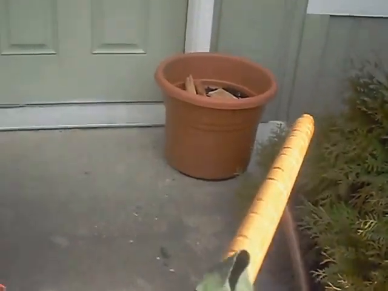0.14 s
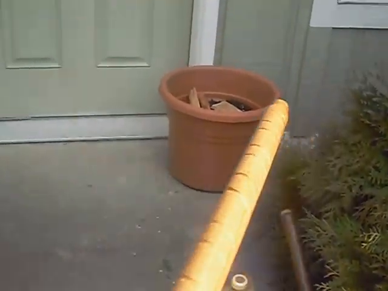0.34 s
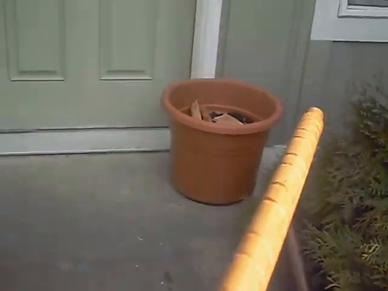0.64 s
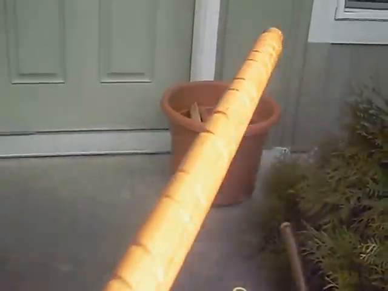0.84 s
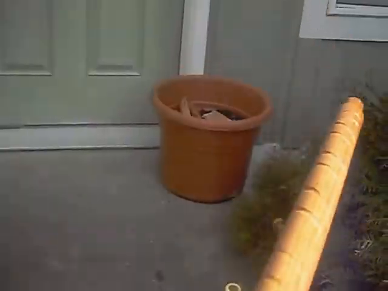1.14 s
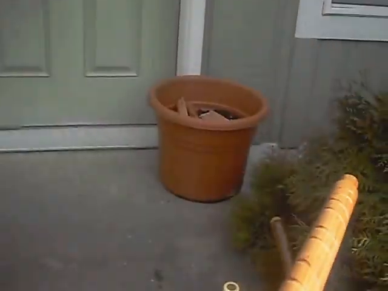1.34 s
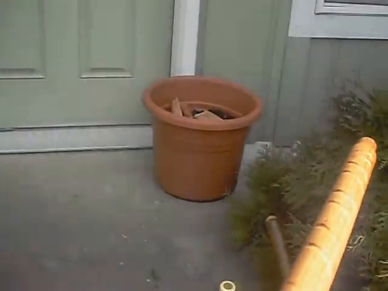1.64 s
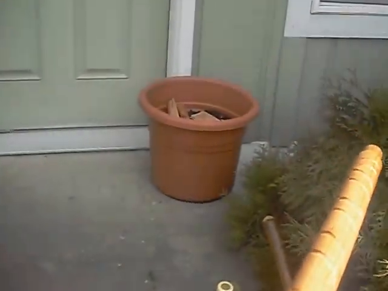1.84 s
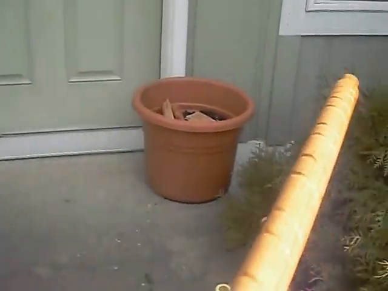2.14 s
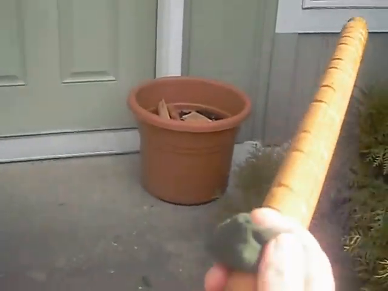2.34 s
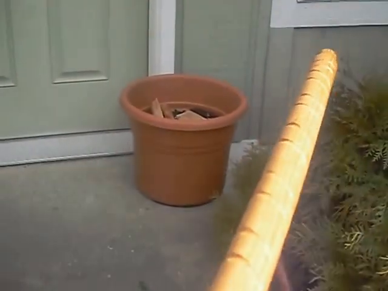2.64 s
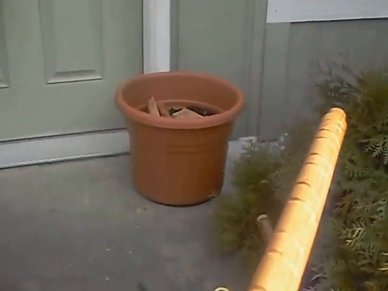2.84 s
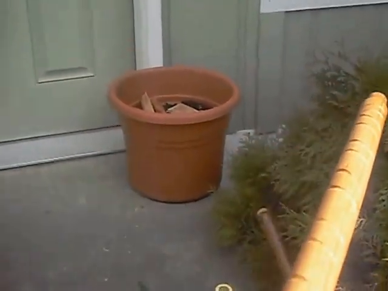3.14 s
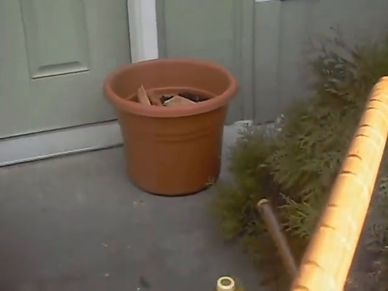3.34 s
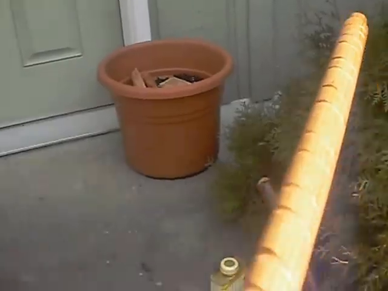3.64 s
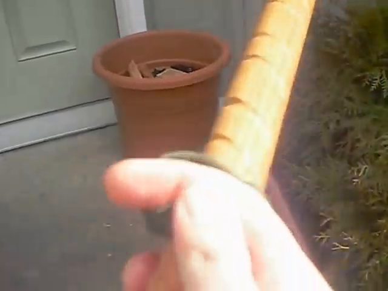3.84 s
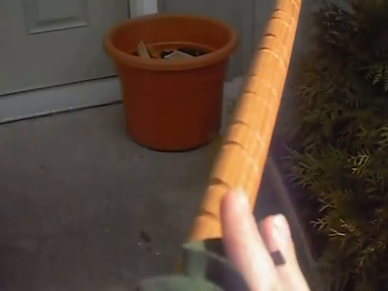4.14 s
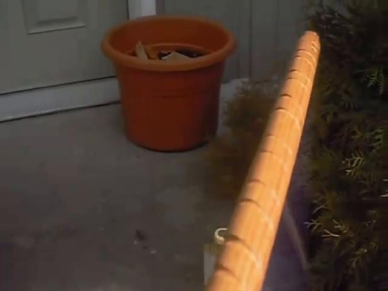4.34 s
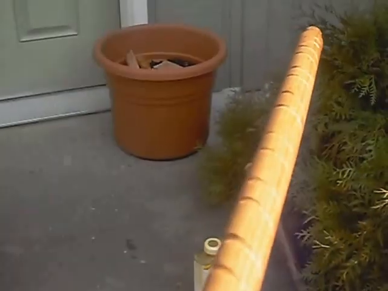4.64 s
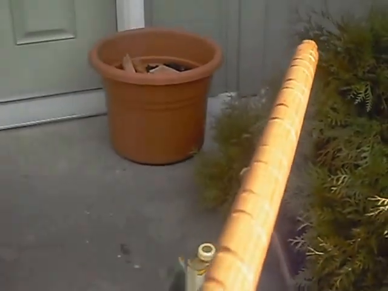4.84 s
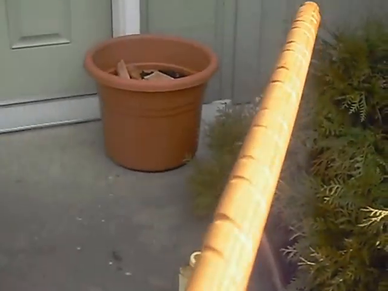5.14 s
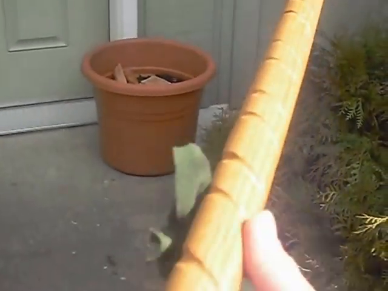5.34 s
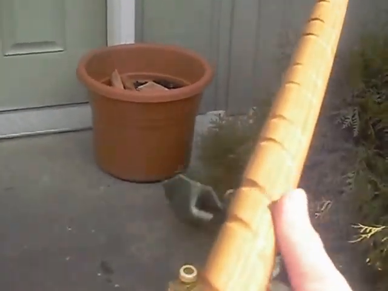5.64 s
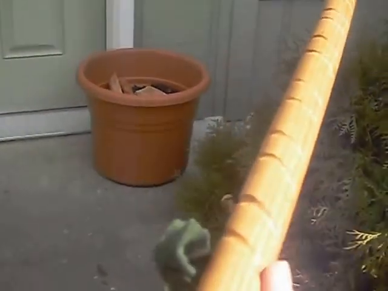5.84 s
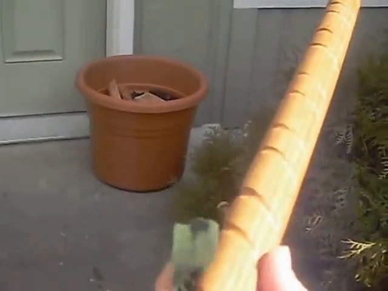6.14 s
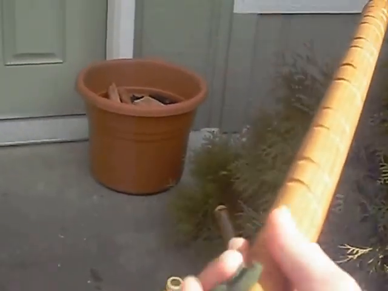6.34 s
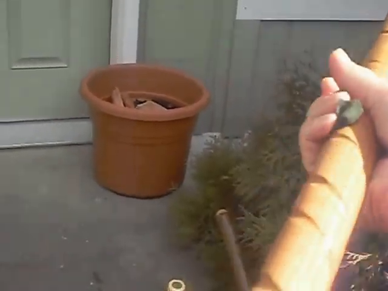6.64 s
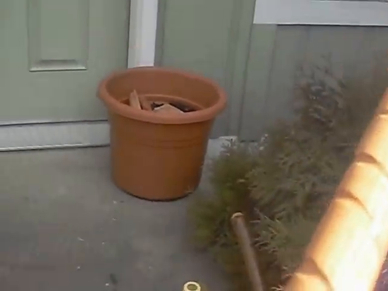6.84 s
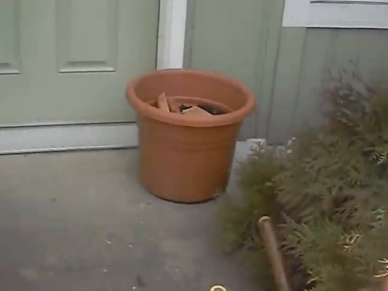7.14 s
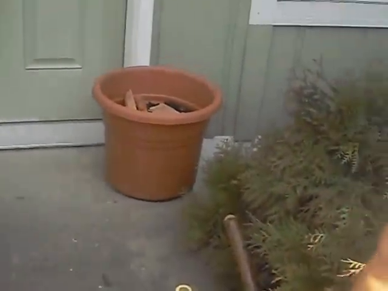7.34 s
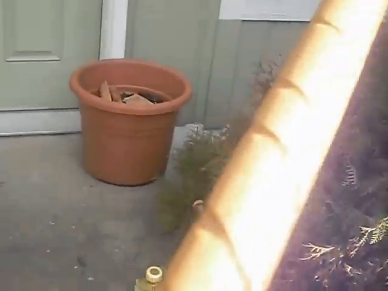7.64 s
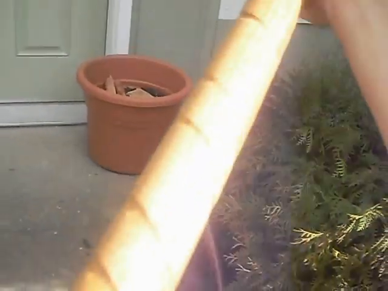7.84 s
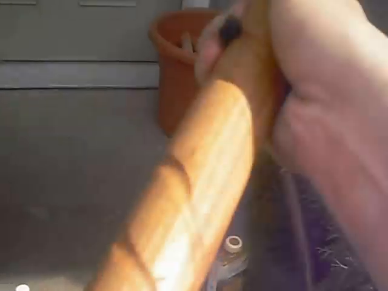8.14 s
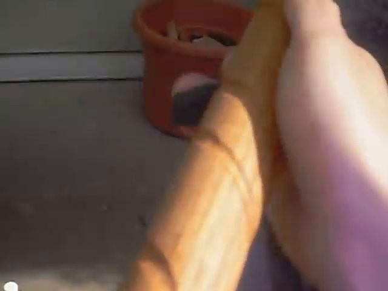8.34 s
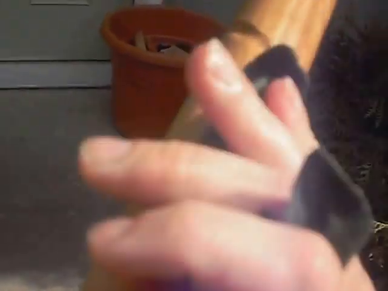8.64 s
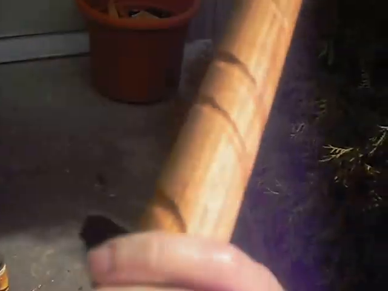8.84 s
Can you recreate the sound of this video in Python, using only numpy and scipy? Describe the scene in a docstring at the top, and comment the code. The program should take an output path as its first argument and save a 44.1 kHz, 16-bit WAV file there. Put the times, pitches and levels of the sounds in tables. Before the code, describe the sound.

Faint brushing of fabric on wood, short and longer swishes overlapping with small gaps. Within the first second a crisp paired tick sounds, followed shortly by a louder dry knock with a tiny porch tail. Rubbing then continues, strongest around two thirds through. Light dull taps and one low soft bump pass almost unnoticed. Low far traffic and constant hiss with a faint piercing whine surround it; a close single microphone.

```python
"""A cloth rag is rubbed in short and longer strokes along a wooden stick: fibres slip as dense clicks,
and the ringing stick, the cupped hand and reflections off hand and floor colour their hiss.
The wood is ticked twice, knocked hard and then faintly, and tapped; its modes ring into a short porch tail.
Far traffic rumbles, roars and hums as shaped noise, there is one dull low jolt, and a steady hiss
and a thin, throbbing high whistle of close tones lie over everything."""
import sys
import numpy as np
from scipy import signal
from scipy.fft import rfft, irfft, next_fast_len
from scipy.io import wavfile
from scipy.ndimage import map_coordinates

SR = 44100
rng = np.random.default_rng(int(sys.argv[2]) if len(sys.argv) > 2 else 0)


def dump_mix(stems):
    """Bounce the given channels to the path in sys.argv[1] as a 16-bit WAV at rate SR."""
    frames = np.atleast_2d(stems).T  # one column per channel
    limited = np.clip(frames, -1, 1)  # hard clip at full scale
    pcm = np.round(limited * 32767).astype(np.int16)
    wavfile.write(sys.argv[1], SR, pcm)


N = 396018  # length in samples
TOP_HZ = 15755  # where the fibre and hiss spectra end

# Strokes of the rag and overlapping swells within longer strokes. Each row: start in seconds,
# speeding up in seconds, slowing down in seconds, rub level at full speed in dB,
# stick body in dB above the rub, fine fibre hiss in dB above the rub,
# pitch of the hollow under the cupped hand in Hz.
RAG_SWELLS = [(0.0, 0.013, 0.024, -57, -1, -7, 4670), (0.021, 0.099, 0.042, -63.5, -14.0, -1, 6100.0),
              (0.167, 0.053, 0.027, -64.5, 1, -1, 4700.0), (0.225, 0.17, 0.12, -59.5, -3.5, -4, 5700.0),
              (0.544, 0.083, 0.054, -64.5, -3, 0, 8000.0), (0.739, 0.045, 0.073, -58, -0.5, 0.5, 6200.0),
              (0.844, 0.12, 0.11, -59, -7, 0.5, 4730), (1.063, 0.032, 0.096, -57.5, -7, 1.0, 8500.0),
              (1.185, 0.026, 0.016, -58.5, -6, -7, 4700.0), (1.303, 0.041, 0.051, -63, 4, -4, 5000.0),
              (1.453, 0.16, 0.071, -62.5, -17, -4, 5900.0), (1.681, 0.056, 0.077, -57.5, -16, -2.5, 6400.0),
              (1.832, 0.1, 0.056, -56, -9, -0.5, 6300.0), (2.007, 0.075, 0.19, -61.5, -9, -4, 4700.0),
              (2.164, 0.26, 0.035, -58, -6, -7.5, 5000.0), (2.479, 0.063, 0.26, -62, -9, -2, 6600.0),
              (2.767, 0.21, 0.013, -59.5, -8.0, -0.5, 4000.0), (2.93, 0.026, 0.025, -59, -10, 6.5, 8000),
              (2.987, 0.084, 0.059, -53, -8, 2, 6300), (3.12, 0.086, 0.069, -61.5, -7, 0, 3000.0),
              (3.238, 0.044, 0.062, -55.5, -9, 6.5, 6500.0), (3.349, 0.038, 0.15, -56, -6, 2, 6500.0),
              (3.445, 0.099, 0.093, -62, 0.5, -17, 3100.0), (3.55, 0.088, 0.045, -55.5, -11.0, -7, 8500.0),
              (3.667, 0.09, 0.28, -57, -4.5, -26, 4400), (3.96, 0.058, 0.063, -65, -6, 1, 6100.0),
              (4.072, 0.063, 0.11, -61.0, -1.0, 0.0, 7800.0), (4.3, 0.041, 0.031, -59.5, -7.0, 4.5, 6400.0),
              (4.389, 0.064, 0.04, -56.5, -13, 6.5, 8900.0), (4.48, 0.034, 0.032, -56.5, -9, 7.5, 6300.0),
              (4.54, 0.11, 0.037, -57, -14.0, 0.5, 4200.0), (4.693, 0.086, 0.065, -54, -5, -1.5, 6100.0),
              (4.844, 0.17, 0.12, -53.5, -9.5, -2.5, 3900.0), (5.108, 0.2, 0.14, -56.0, -3, -3, 5900.0),
              (5.328, 0.13, 0.16, -54, -2.5, -2.5, 8760), (5.626, 0.209, 0.072, -54.5, -10, -8, 3960),
              (6.008, 0.036, 0.051, -65.5, -8, -14, 3800.0), (6.161, 0.029, 0.046, -60.5, -1, -5, 9100.0),
              (6.218, 0.039, 0.045, -55.5, -8, -4, 6000.0), (6.32, 0.28, 0.1, -50.5, -9, -1, 6300),
              (6.43, 0.044, 0.11, -52, -4, -3, 3500.0), (6.59, 0.21, 0.3, -49.0, -7, -0.5, 4730),
              (6.96, 0.11, 0.29, -54, -7, -5, 4724), (7.301, 0.085, 0.074, -60.5, 1, -2.5, 3835),
              (7.468, 0.079, 0.16, -57.5, -3, -7, 5900.0), (7.645, 0.15, 0.2, -53.5, -2.5, -6, 4700.0),
              (7.898, 0.15, 0.15, -55, -1.5, -1, 4730), (8.165, 0.13, 0.044, -53, -4.5, -3.5, 8400.0),
              (8.36, 0.025, 0.075, -64, -12, -4, 5100.0), (8.479, 0.1, 0.017, -60.5, 0.5, -1.5, 2800.0),
              (8.55, 0.028, 0.024, -62.5, -5, 6.5, 8000), (8.722, 0.052, 0.14, -56.5, -9.5, -0.5, 4200.0),
              (8.916, 0.092, 0.009, -62.5, -2, 1, 4000.0)]
# Tone of the three rubbing layers. Each row: frequency in Hz, relative density in dB per Hz.
BODY_SPECTRUM = [(900, -22), (1500, -1), (2000, -1.5), (2800, -5.5), (4500, -17)]
RUB_SPECTRUM = [(1800, -14), (2900, -1), (4500, 4), (6800, -1.5), (10000, -10.5)]
FIBRE_SPECTRUM = [(5500, -6.5), (7400, 0), (10700, -1.5), (13500, -7), (TOP_HZ, -6)]
# Resonances that the rub keeps ringing. Each row: frequency in Hz, width in Hz, level before the grip in dB.
STICK_RESONANCES = [(1853, 100, -4.5), (2800, 42, -16.5), (3300, 63, -15), (3770, 41, -16), (4190, 51, -17),
                    (4800, 92, -27.5), (5540, 93, -24), (6170, 69, -35), (8560, 240, -8)]
# How freely the held stick rings under the rub. Each row: time in seconds, change of level in dB.
GRIP_CURVE = [(0, 0), (2.8, 4), (3.3, 0), (3.9, 3), (4.3, -5), (6.3, 1), (6.9, -5), (8.2, 4), (8.98, -8)]
# Reflection of the rub off the hand. Each row: time in seconds, lag in ms, strength from 0 to 1.
HAND_REFLECTION = [(0, .33, .12), (2.4, .33, .12), (3.5, .3, .22), (4.5, .31, .13), (5.9, .3, .24),
                   (6.42, .28, .22), (6.8, .318, .28), (7.2, .38, .2), (7.6, .33, .07), (8.98, .27, .13)]
# Hard contacts. Each row: time in seconds, strength ahead of the wood modes in dB.
TICK_HITS = [(.7209, -12.5), (.7308, -16.5)]
KNOCK_HITS = [(1.1572, -5.5), (1.2130, -49)]
# Fingers and folds of cloth on the wood. Each row: time in seconds, relative strength in dB.
TAP_HITS = [(0.013, -52), (0.24, -41), (0.2673, -33), (0.3745, -44), (1.6247, -39), (2.1495, -41),
            (2.172, -36), (2.5213, -38), (3.0364, -44), (4.2585, -34.5), (4.7498, -44), (5.23, -37),
            (7.7125, -35), (7.7994, -44), (8.745, -48), (8.9645, -38)]
# The small slips in which a finger lands. Each row: lag from the tap in seconds, change of strength in dB.
TAP_CREEP = [(-.005, -3), (0, 1), (.007, -2)]
# Modes of the struck stick. Each row: frequency in Hz, level when ticked in dB, level when knocked in dB,
# 60 dB decay in seconds.
WOOD_MODES = [(597, -15.5, -38.5, 0.0082), (830, -15.5, -18, 0.017), (1086, -6, -7, 0.0086),
              (1665, -4, -14, 0.021), (1900, -34, -31, 0.058), (2000, -1.5, -6, 0.013),
              (2284, -28, -34, 0.13), (2450, -18, -4, 0.0082), (3030, -5, -1.5, 0.004),
              (3320, -5.5, -1, 0.0085), (4000, -10.5, -10.5, 0.0087), (4540, -6, -9, 0.0074),
              (5200, -2.5, -11.5, 0.0089), (6820, -23, -19, 0.0056), (8400, -12.5, -12.5, 0.0089),
              (11100, -29, -20.5, 0.006), (14750, -19, -18, .005), (1510, -40, -28.5, 0.082)]
# Tone of the scattered returns. Each row: frequency in Hz, relative density in dB per Hz.
PORCH_SPECTRUM = [(500, -8), (1000, -3), (2000, -10), (4000, -8), (8000, -4)]
# Dull low jolts. Each row: time in seconds, strength in dB, frequency in Hz, 60 dB decay in seconds.
JOLTS = [(5.727, -41, 48.2, 0.13)]
# Traffic levels ahead of the wavering. Each row: time in seconds, rumble in dB, tyre roar in dB.
TRAFFIC_LEVELS = [(0.0, -66.5, -58), (0.7, -62, -57.5), (2.4, -64.5, -55.5), (4.48, -64.5, -56.5),
                  (5.55, -63.5, -57), (7.75, -64, -54), (7.9, -62.5, -52.5), (8.45, -63, -55),
                  (8.98, -60, -55)]
# Tone of traffic and steady hiss. Each row: frequency in Hz, relative density in dB per Hz.
RUMBLE_SPECTRUM = [(12, -17), (25, 4.5), (45, -9), (60, -2), (75, -5.5), (90, -0.5), (130, -9.5),
                   (200, -35)]
ROAR_SPECTRUM = [(100, -18), (160, -4), (280, -3), (450, 1), (640, -3), (820, 0.5), (1100, 0), (1400, -3),
                 (1900, -11), (3200, -17)]
HISS_SPECTRUM = [(1100, -16), (2200, 0), (5800, -4.5), (10000, -7), (14700, -7.5), (TOP_HZ, 4)]
# Close tones that beat, and a faint one an octave below. Each row: frequency in Hz, rms before the top cut in dB.
WHISTLE_TONES = [(15734.26, -67.7), (15747.29, -72.3), (15777.32, -86), (7867.13, -84)]

SLIPS_PER_S, SLIP_SPREAD_DB = 9000, 2
BODY_POWER, RUB_POWER, FIBRE_POWER = 0.74, 0.71, 0.88  # layer strength goes as speed to this power
HOLLOW_WIDTH_HZ, HOLLOW_DB = 340, -3.5
SECOND_BOUNCE = 0.29  # hand to stick and back once more: share of the first reflection
FLOOR_LAG_S, FLOOR_DB = 0.00213, -18.5  # a later reflection off the concrete
TAPS_DB, TAP_SOFT_HZ = -13.5, 3000
TAP_RING_HZ, TAP_RING_WIDTH_HZ, TAP_RING_DB = 1820, 270, 8.5
PORCH_T60_S, PORCH_DB = 0.045, -22
HUM_HZ, HUM_WIDTH_HZ, HUM_DB = 59.5, 4.2, -66
HISS_DB = -63  # rms before the top cut
WHISTLE_SWELL_S = 0.0718  # a moment when the tones agree
CUTOFF_HZ = 17060  # where the top cut reaches its full depth


def rag():
    """Slips sound in the wood, at the contact and in the fibres; stick, hand and floor colour them."""
    body_gain, rub_gain, fibre_gain = strengths()
    body = body_gain * from_db(1.9 * drift(12)) * colour(slips(), BODY_SPECTRUM)
    rub = rub_gain * from_db(1.0 * drift(5.2)) * colour(slips(), RUB_SPECTRUM)
    fibre = fibre_gain * from_db(1.0 * drift(19)) * colour(slips(), FIBRE_SPECTRUM)
    hiss = from_db(0.87 * drift(29)) * (body + rub + fibre)
    hiss = hiss + hollow(hiss)
    hiss = hiss + stick(hiss)
    return reflections(hiss)


def strengths():
    """Gain of body, rub and fibre layers; overlapping swells add in power."""
    power = np.zeros((3, N))
    for (span, speed), row in zip(swells(), RAG_SWELLS):
        *_, rub_db, body_db, fibre_db, _ = row
        layers = [(body_db, BODY_POWER), (0, RUB_POWER), (fibre_db, FIBRE_POWER)]
        for k, (above_rub_db, law) in enumerate(layers):
            gain = from_db(rub_db + above_rub_db) * speed ** law
            power[k, span] += gain ** 2
    return np.sqrt(power)


def swells():
    """Sample span and speed 0-1 of each swell of the rub: it rises and sinks by quarter sines."""
    for start_s, up_s, down_s, *_ in RAG_SWELLS:
        length_s = up_s + down_s
        span = slice(round(start_s * SR), min(round((start_s + length_s) * SR), N))
        t = np.arange(span.start, span.stop) / SR - start_s
        ramp = np.minimum(t / up_s, (length_s - t) / down_s)
        yield span, np.sin(np.pi / 2 * np.clip(ramp, 0, 1))


def slips():
    """Fibres catch and let go: dense clicks of uneven size and random sign."""
    size_db = SLIP_SPREAD_DB * np.minimum(rng.exponential(1, N), 5)
    sizes = from_db(size_db) * rng.choice([-1, 1], N)
    return sizes * (rng.random(N) < SLIPS_PER_S / SR)


def hollow(hiss):
    """The cupped hand lifts one broad band, at its own pitch in each swell."""
    out = np.zeros(N)
    for (span, speed), row in zip(swells(), RAG_SWELLS):
        out[span] += resonate(speed * hiss[span], row[-1], HOLLOW_WIDTH_HZ)
    return from_db(HOLLOW_DB) * out


def stick(hiss):
    """Each resonance wavers on its own, while a shared grip curve raises or lowers them all."""
    grip_db, = in_time(GRIP_CURVE)
    out = np.zeros(N)
    for hz, width_hz, db in STICK_RESONANCES:
        gain = from_db(db + grip_db + 3.8 * drift(4.4))
        out += gain * resonate(hiss, hz, width_hz)
    return out


def reflections(hiss):
    """Short moving delays off the hand comb the rub, and a later one returns from the floor."""
    lag_ms, strength = in_time(HAND_REFLECTION)
    lag = lag_ms * SR / 1000  # samples
    once = map_coordinates(hiss, [np.arange(N) - lag], order=3)
    twice = map_coordinates(hiss, [np.arange(N) - 2 * lag], order=3)
    off_hand = once + SECOND_BOUNCE * twice
    heard = (hiss + strength * off_hand) / np.sqrt(1 + strength ** 2)  # mostly colour, little level
    return heard + from_db(FLOOR_DB) * np.roll(hiss, round(FLOOR_LAG_S * SR))


def contacts():
    """Blows on the wood, followed by a short scattered tail from floor and walls."""
    ticks = strike(TICK_HITS, "tick", touch_s=0.0003, touch_db=-10.5, spread_db=0.0)
    knocks = strike(KNOCK_HITS, "knock", touch_s=0.0003, touch_db=-8.0, spread_db=2.0)
    blows = ticks + knocks + taps()
    t = np.arange(SR // 5) / SR
    tail = colour(rng.standard_normal(len(t)), PORCH_SPECTRUM)
    tail = tail * from_db(-60 * t / PORCH_T60_S) * (t > 0.002)
    tail = tail / np.sqrt(np.sum(tail ** 2))  # unit energy
    return blows + from_db(PORCH_DB) * signal.fftconvolve(blows, tail)[:N]


def taps():
    """Fingers and cloth creep onto the wood, ring one band and dull the contact."""
    hits = [(s + lag_s, db + change_db) for s, db in TAP_HITS for lag_s, change_db in TAP_CREEP]
    out = from_db(TAPS_DB) * strike(hits, "tick", touch_s=0.00024, touch_db=-7, spread_db=4.0)
    out = out + from_db(TAP_RING_DB) * resonate(out, TAP_RING_HZ, TAP_RING_WIDTH_HZ)
    soft = np.exp(-2 * np.pi * TAP_SOFT_HZ / SR)  # one-pole low-pass
    return signal.lfilter([1 - soft], [1, -soft], out)


def strike(hits, spot, touch_s, touch_db, spread_db):
    """Every hit is a first touch and then the full contact; it sets all modes ringing, signs alternating."""
    hits = np.array(hits)
    at = np.round(hits[:, 0] * SR).astype(int)
    chance = rng.standard_normal((len(at), len(WOOD_MODES)))
    out = np.zeros(N)
    for k, (hz, tick_db, knock_db, t60) in enumerate(WOOD_MODES):
        mode_db = {"tick": tick_db, "knock": knock_db}[spot]
        clicks = np.zeros(N)
        clicks[at] = from_db(hits[:, 1] + mode_db + spread_db * chance[:, k])
        clicks = from_db(touch_db) * clicks + np.roll(clicks, round(touch_s * SR))
        out += (-1) ** k * ring(clicks, hz, t60)
    return out


def jolt():
    """A low, dying swing of the microphone membrane, downward first."""
    out = np.zeros(N)
    for s, strength_db, hz, t60 in JOLTS:
        click = from_db(strength_db) * (np.arange(N) == round(s * SR))
        out -= ring(click, hz, t60)
    return out


def traffic():
    """Far rumble and tyre roar are slowly wavering noise; noise ringing one resonance makes a low hum."""
    rumble_db, roar_db = in_time(TRAFFIC_LEVELS)
    rumble = from_db(rumble_db + 1.1 * drift(3.8)) * colour(rng.standard_normal(N), RUMBLE_SPECTRUM)
    roar = from_db(roar_db + 0.6 * drift(4)) * colour(rng.standard_normal(N), ROAR_SPECTRUM)
    hum = from_db(HUM_DB) * rms_one(ring(rng.standard_normal(N), HUM_HZ, 2.0 / HUM_WIDTH_HZ))
    return rumble + roar + hum


def steady_hiss():
    """Noise of constant level, shaped by a fixed spectrum."""
    return from_db(HISS_DB) * colour(rng.standard_normal(N), HISS_SPECTRUM)


def whistle():
    """Close high cosines beat as a thin, throbbing whistle."""
    t = np.arange(N) / SR - WHISTLE_SWELL_S
    return sum(np.sqrt(2) * from_db(db) * np.cos(2 * np.pi * hz * t) for hz, db in WHISTLE_TONES)


def resonate(x, hz, width_hz):
    """A two-pole resonance with a gain of 1 at its peak."""
    r = np.exp(-np.pi * width_hz / SR)
    top = np.array([1, 0, -1]) * (1 - r * r) / 2
    return signal.lfilter(top, [1, -2 * r * np.cos(2 * np.pi * hz / SR), r * r], x)


def ring(clicks, hz, t60):
    """A unit click sets a decaying sine of starting height about 1 ringing."""
    r = from_db(-60 / (t60 * SR))
    w = 2 * np.pi * hz / SR
    return signal.lfilter([0, np.sin(w)], [1, -2 * r * np.cos(w), r * r], clicks + 1e-18)


def colour(x, spectrum):
    """Shape a broad signal by a spectrum that ends steeply; rms 1."""
    size = next_fast_len(len(x))
    hz = np.maximum(np.arange(size // 2 + 1) * SR / size, 1)
    points = np.array(spectrum)
    db = np.interp(np.log(hz), np.log(points[:, 0]), points[:, 1], left=-120, right=-120)
    return rms_one(irfft(rfft(x, size) * from_db(db), size)[:len(x)])


def drift(rate):
    """Slow random wavering of rms 1, faster for a higher rate in Hz."""
    r = np.exp(-80 * np.pi * rate / SR)  # two equal poles, run at one value per 40 samples
    noise = rng.standard_normal(N // 40 + 2002)
    slow = signal.lfilter([1], [1, -2 * r, r * r], noise)[2000:]  # skip the filter's start
    return np.interp(np.arange(N) / 40, np.arange(len(slow)), rms_one(slow))


def in_time(rows):
    """Columns of a curve table at every sample."""
    s, *columns = np.transpose(rows)
    return [np.interp(np.arange(N) / SR, s, column) for column in columns]


def rms_one(x):
    """Scale to unit rms."""
    return x / np.sqrt(np.mean(x ** 2) + 1e-20)


def from_db(db):
    """Decibels to gain."""
    return 10 ** (np.asarray(db) / 20)


def scene():
    """One microphone feeds both channels."""
    mono = rag() + contacts() + jolt() + traffic() + steady_hiss() + whistle()
    return np.array([mono, mono])


def record(dry):
    """A steep low-pass cuts the top."""
    top_cut = signal.cheby2(12, 70, CUTOFF_HZ, fs=SR, output="sos")
    return signal.sosfilt(top_cut, dry)


dry = scene()
out = record(dry)
dump_mix(out)
```